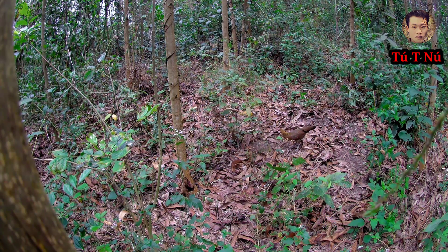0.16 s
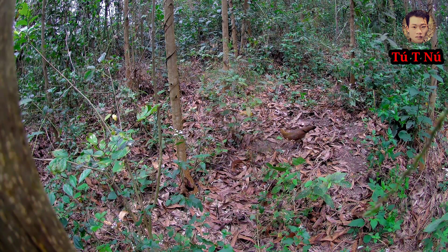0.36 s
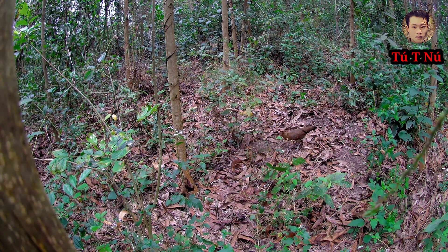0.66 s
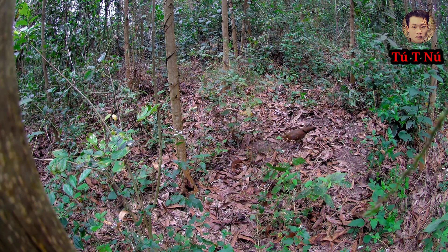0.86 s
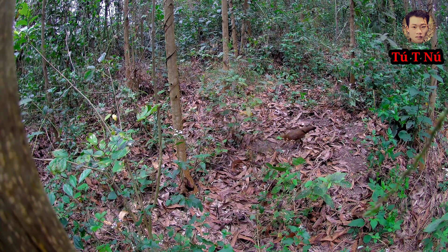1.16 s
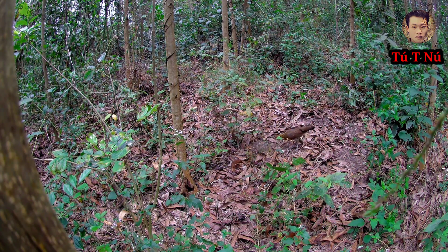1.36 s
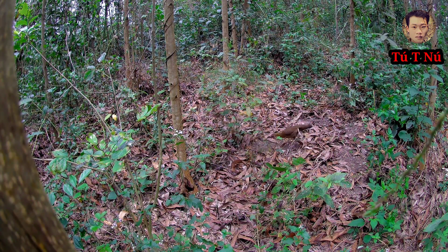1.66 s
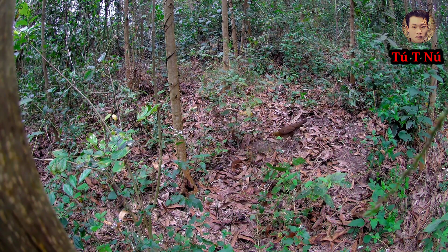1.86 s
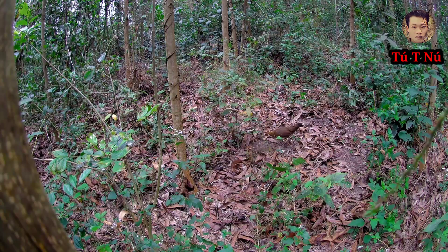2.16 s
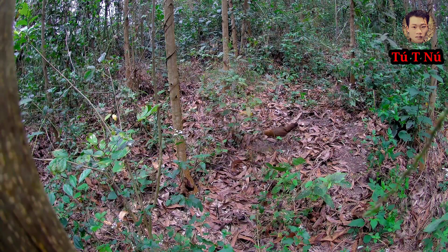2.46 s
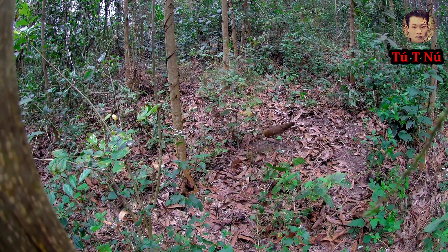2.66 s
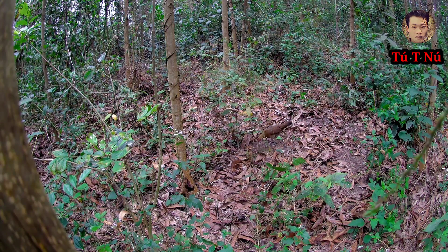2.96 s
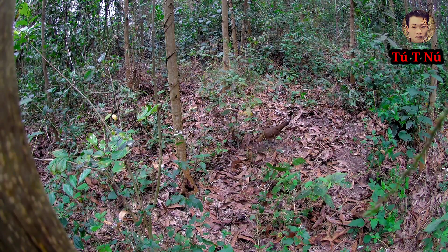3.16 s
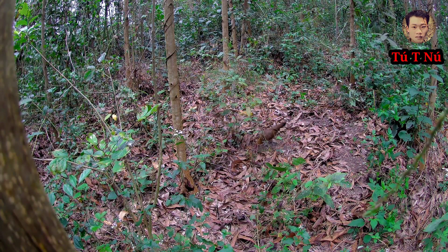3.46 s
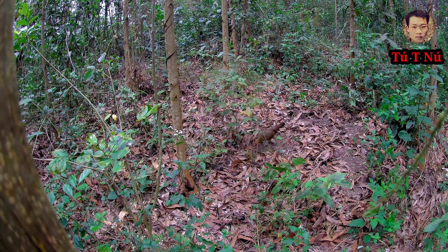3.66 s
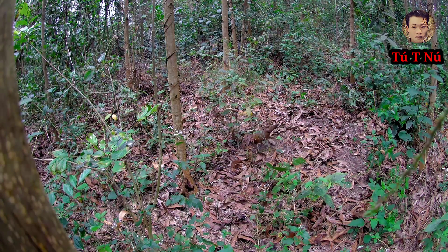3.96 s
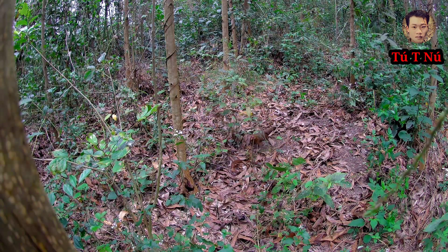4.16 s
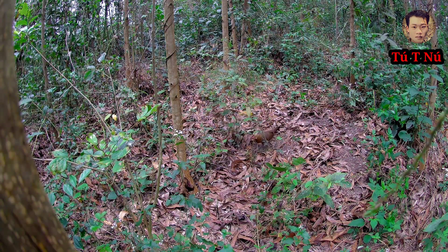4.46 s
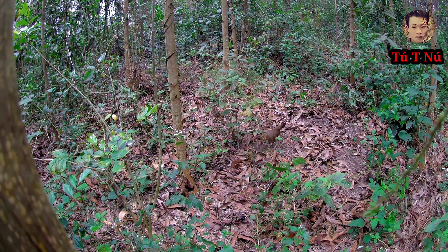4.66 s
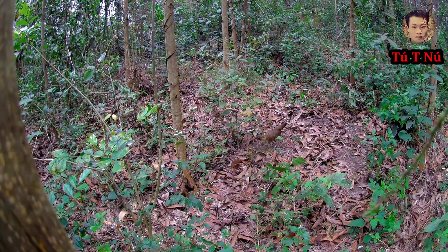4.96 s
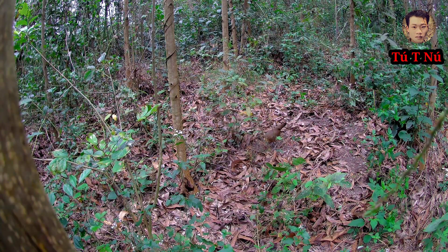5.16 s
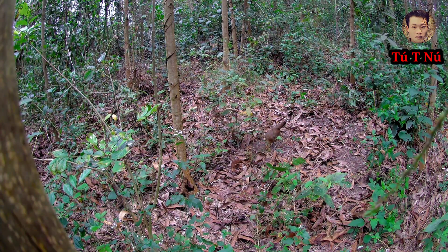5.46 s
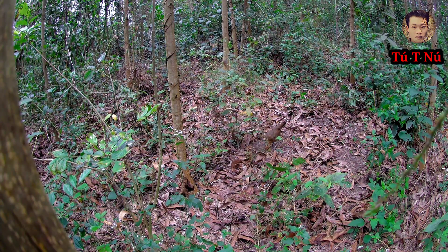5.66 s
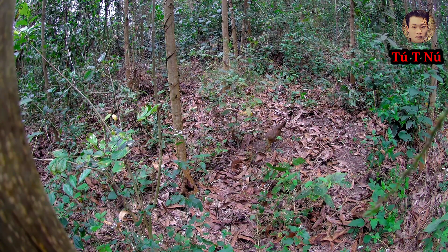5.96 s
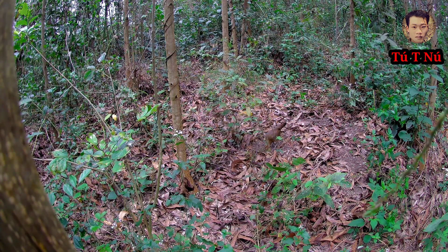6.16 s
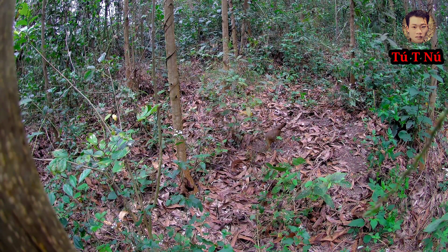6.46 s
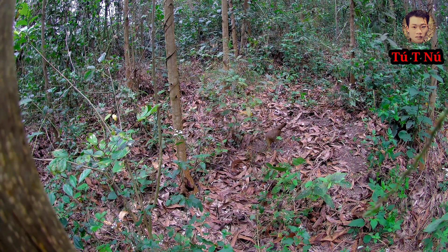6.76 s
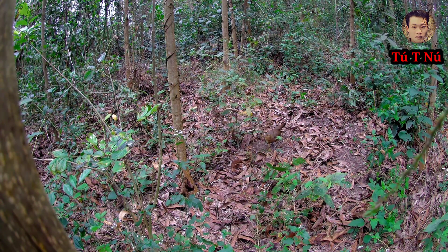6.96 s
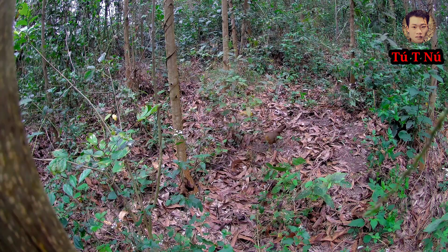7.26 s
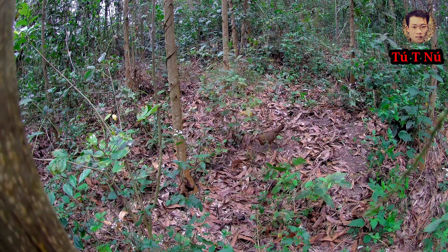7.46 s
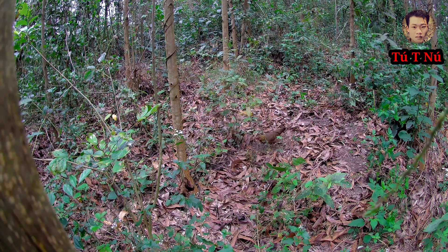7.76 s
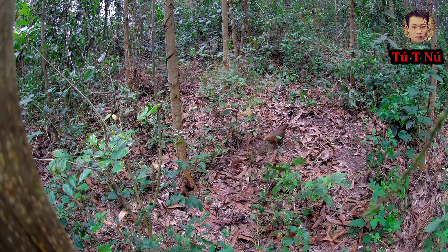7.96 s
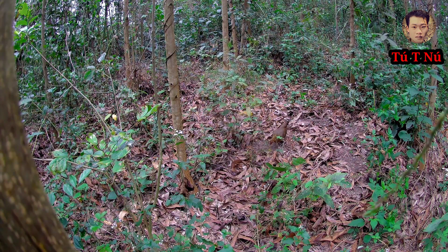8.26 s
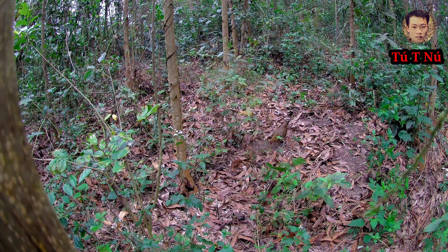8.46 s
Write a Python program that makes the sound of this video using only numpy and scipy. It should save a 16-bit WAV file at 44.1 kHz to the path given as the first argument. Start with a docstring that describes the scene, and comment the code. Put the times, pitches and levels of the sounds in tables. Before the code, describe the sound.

In a hushed forest clearing, a junglefowl hen cackles rapidly and trails off into husky cries, with faint cricket chirps behind.

```python
"""A junglefowl hen cackles some metres away in a quiet forest clearing; the trees answer weakly.
First her voice box gives a thin rising whine, while a cricket starts to chirp faintly with its wings.
Pushed harder, her voice slips and breaks into a run of harsh clucks with soft notes between them.
Then come drawn-out cries that swing between a husky tone and a rasp.
Dry leaves rustle under her feet, once before the cries and again after she falls silent."""
import sys
import numpy as np
from scipy import signal
from scipy.fft import rfft, irfft, next_fast_len
from scipy.io import wavfile
from scipy.ndimage import map_coordinates

SR = 44100
rng = np.random.default_rng(int(sys.argv[2]) if len(sys.argv) > 2 else 0)


def master(y):
    """Save y as 16-bit WAV."""
    cut = np.clip(np.atleast_2d(y).T, -1, 1)
    pcm = np.round(cut * 32767)  # scale
    wavfile.write(sys.argv[1], SR, pcm.astype(np.int16))


N = 380141
MARGIN_S = .02  # room before and after each call for its fades

# Harsh clucks, in the run and at the head of most cries: start_s, length_s, pitch_hz, level_db, swell_db
CLUCKS = [(1.637, 0.089, 501, -31.5, 2.5), (1.84, 0.097, 493.3, -31, 3), (2.034, .084, 491.6, -32, 1.5),
          (2.227, 0.094, 474.4, -32.5, 5), (2.427, 0.089, 486, -32.5, 1.5), (2.624, 0.089, 484.4, -33, 3.5),
          (2.832, 0.095, 483, -35, 0.5), (3.042, 0.098, 524, -37, 5.5), (3.254, 0.11, 508, -34, 6.5),
          (3.486, 0.1, 489, -34, 6.5), (3.711, 0.094, 484, -33, 5), (3.937, .091, 474.3, -33, 3),
          (4.156, 0.09, 481, -33.5, 3.5), (4.24, 0.034, 449.4, -44, 3), (4.404, 0.019, 514, -39, 8),
          (4.76, 0.014, 511, -39.5, 2), (5.153, 0.018, 520, -38.5, 4.5), (5.589, 0.016, 497, -38, 4),
          (6.132, 0.012, 507, -40, 6), (6.841, 0.051, 480.6, -39.5, -2.5)]


def clucks(sag=0.046, droop=0.031, usual_hz=494, peak_share=0.72, closing_db=-6.5):
    """Each cluck starts abruptly, swells, then darkens as the beak shuts; the run grows rougher."""
    out = np.zeros(N)
    for start, length, pitch_hz, db, swell_db in CLUCKS:
        t = clock(length)
        n, progress = len(t), np.clip(t / length, 0, 1)
        bend = sag * (.5 - np.sin(np.pi * progress)) + droop * (.5 - progress)
        pitch = pitch_hz * (1 + bend + 0.0316 * wobble(n, 90.7))
        source = rasp(pitch, scatter=min(.06 + .02 * (start - CLUCKS[0][0]), .105))
        centre_hz = THROAT_HZ * (pitch_hz / usual_hz) ** 0.36  # the throat partly follows the pitch
        shut = progress ** 4
        voice = (1 - shut) * throat(source, centre_hz) + shut * throat(source, centre_hz * 0.912)
        voice = unit(voice * amp(wobble(n, 196.3)))  # flutters by about 1 dB
        closing = np.clip((progress - peak_share) / (1 - peak_share), 0, 1)
        level_db = db - swell_db * np.clip(1 - progress / peak_share, 0, 1) + closing_db * closing ** 2
        add(out, start - MARGIN_S, voice * amp(level_db) * fade(t, length, .005, 0.46 * length))
    return out


# Tone of the hard-pushed voice box, strongest where it locks to the windpipe: frequency_hz, gain_db
RASP_TONE = [(500, -25), (930, -11), (1300, -9.5), (1550, -20.5), (1870, 0.5), (2060, 3.5), (2450, -8.5),
             (3000, -13.5), (4500, -18), (8000, -41)]


def rasp(pitch, scatter, noise_db=-8.5):
    """Pushed hard, the voice box slips every few milliseconds, smearing its harmonics into a rasp."""
    n = len(pitch)
    cycles = np.cumsum(pitch) / SR
    jumps, swing = slips(n, per_s=1900 * max(scatter, .01))
    disorder = jumps + np.cumsum(pitch * scatter * wobble(n, 1500)) / SR
    tone = np.zeros(n)
    for k in range(1, 17):
        share = 0.607 if k <= 2 else 1  # the lowest two stay steadier, so the call keeps a pitch
        phase = 2 * np.pi * (k * (cycles + disorder * share) + rng.random())
        tone += amp(look_up(RASP_TONE, k * pitch)) * np.sin(phase)
    return unit(tone * swing) + amp(noise_db) * rng.standard_normal(n)


def slips(n, per_s, jump_cycles=.17, dip=.95, width_s=.0026):
    """At each sudden slip, the vibration of the voice box jumps out of step and briefly collapses."""
    gaps = np.exp(.5 * rng.standard_normal(int(n * per_s / SR) * 2 + 4))
    at = (np.cumsum(gaps) * SR / per_s).astype(int)
    marks = (np.bincount(at[at < n], minlength=n) > 0) * 1.
    bump = np.hanning(int(width_s * SR))
    kicks = np.convolve(marks * jump_cycles * rng.standard_normal(n), bump / bump.sum(), "same")
    swing = np.clip(1 - dip * np.convolve(marks, bump, "same"), 0, 1)
    return np.cumsum(kicks), swing


# How the windpipe and beak shape the voice when tuned to THROAT_HZ: frequency_hz, gain_db
THROAT_TONE = [(300, -49), (620, 4.5), (950, -1), (1230, -4), (1600, 4), (1980, 3), (2600, -2.5),
               (3170, -16), (3850, -23.5), (4120, -2), (4530, -13.5), (5150, -6), (5550, -26.5),
               (7600, -12), (10000, -45)]
THROAT_HZ = 1980


def throat(x, centre_hz=THROAT_HZ):
    """The throat rings at several frequencies, which move together as the beak opens."""
    return filtered(x, lambda hz: amp(look_up(THROAT_TONE, hz * THROAT_HZ / centre_hz)))


# Drawn-out cries, one list of points for each: time_s, pitch_hz, level_db
CRY_CURVES = [
    [(4.42, 618, -52), (4.454, 651, -35), (4.472, 475, -33), (4.484, 452, -33), (4.54, 568.5, -47),
     (4.586, 563, -43), (4.598, 536, -42), (4.618, 530, -46.5)],
    [(4.69, 479, -53), (4.756, 506, -52), (4.766, 556.5, -51.5), (4.81, 599.4, -37.5), (4.83, 452, -31.5),
     (4.86, 455, -35.5), (4.884, 517, -34.5), (4.912, 488, -51), (4.964, 493, -35.5), (4.978, 457, -33),
     (4.996, 470, -41.5)],
    [(5.174, 563, -50), (5.21, 618, -42), (5.23, 502.5, -30.5), (5.242, 510.4, -36.5), (5.266, 575.4, -44),
     (5.312, 600, -53), (5.322, 608.5, -37), (5.34, 524, -34.5), (5.378, 583, -40.5), (5.4, 505, -47)],
    [(5.606, 531.7, -48), (5.638, 540.4, -37.5), (5.7, 467, -34), (5.724, 484, -34), (5.738, 528.5, -39),
     (5.78, 548, -37), (5.788, 523.2, -33.5), (5.836, 502, -36.5), (5.858, 554, -46)],
    [(6.15, 566.4, -47), (6.228, 609, -47), (6.248, 633, -35), (6.296, 608.8, -35.5), (6.31, 663, -39),
     (6.354, 669, -38.5), (6.378, 606, -39.5), (6.4, 614.4, -43.5)],
    [(6.41, 578.5, -45), (6.436, 598, -47), (6.446, 565, -45.5), (6.486, 603, -37), (6.496, 620, -36.5),
     (6.552, 605.5, -50)],
    [(6.588, 594, -50.5), (6.644, 583, -46), (6.657, 620, -49)],
]


def cries(break_db=-44.5, break_width_db=5.5, locked_hz=500, ring_hz=2130, ring_width_hz=67):
    """When the hen pushes harder, a husky tone breaks into a rasp pulled toward the windpipe's pitch."""
    out = np.zeros(N)
    windpipe_ring = lambda hz: amp(0.5 / (1 + ((hz - ring_hz) / ring_width_hz) ** 2))
    for curve in CRY_CURVES:
        start, length, t, pitch, db = follow(curve)
        husky = soft_voice(pitch, -46 + look_up(THROAT_TONE, 2 * pitch), db - 2, hoarse=0.372)
        source = rasp(locked_hz * (pitch / locked_hz) ** .4, scatter=.095)
        harsh = filtered(throat(source, centre_hz=1975), windpipe_ring)
        harsh = amp(db + 0.35) * unit(harsh * amp(1.45 * wobble(len(t), 131)))
        voice = crack(husky, harsh, (db - break_db) / break_width_db)
        add(out, start - MARGIN_S, voice * fade(t, length, 0.0035, 0.042))
    return out


# Points along the opening whine: time_s, pitch_hz, level_db
WHINE_CURVE = [(0.74, 375, -45.5), (0.764, 385, -45.5), (0.794, 497, -68), (0.818, 409.4, -44),
               (0.836, 484, -54.5), (0.886, 499, -54.5), (0.988, 531, -48.5), (1.012, 480, -44),
               (1.174, 523, -29.5), (1.22, 510, -35), (1.282, 546, -32), (1.3, 504, -30.5),
               (1.326, 551, -36.5), (1.35, 522, -39), (1.396, 500.7, -40), (1.44, 550, -35),
               (1.498, 513, -34.5), (1.51, 500, -39.5)]


def whine(waver=0.00384, strain=0.036, flutter_db=2, odd_join_s=1.04, break_width_db=1.7):
    """A long clear note swells, grows unsteady and cracks ever more easily."""
    out = np.zeros(N)
    start, length, t, pitch, db = follow(WHINE_CURVE)
    n, late = len(t), np.clip(t / length, 0, 1) ** 2
    shaky_pitch = pitch * (1 + waver * wobble(n, 150) + strain * late ** 2 * wobble(n, 1000))
    second_db = -50 + 0.21 * (db - db.max()) + flutter_db * np.sqrt(late) * wobble(n, 220)
    upper_db = db - 2 + flutter_db * late * wobble(n, 220)
    # the note sounds an octave higher until the odd harmonics join
    odd_gain = np.clip((start + t - odd_join_s) / 0.062 + .5, 0, 1)
    clear = clear_voice(shaky_pitch, second_db, upper_db, odd_gain)
    # the nearly shut beak cuts both treble and bass
    clear = filtered(clear, lambda hz: 1 / (1 + (hz / 5250) ** 20) / (1 + (680 / (hz + 1)) ** 10))
    harsh = amp(db + 2.3) * unit(throat(rasp(pitch, scatter=0.077)))
    break_db = -37.5 + 29.5 * (length - t)
    voice = crack(clear, harsh, (db - break_db) / break_width_db) * amp(0.8 * wobble(n, 121.5))
    add(out, start - MARGIN_S, voice * fade(t, length - .005, .005, 0.0064))
    return out


def crack(clear, harsh, excess):
    """Pushed past its limit (excess above 0), the clear voice gives way to the rasp."""
    share = .5 + .5 * np.tanh(excess)
    return np.sqrt(1 - share) * clear + np.sqrt(share) * harsh


# Soft notes between the clucks: start_s, length_s, final_pitch_hz, level_db, upper_boost_db
SOFT_NOTES = [(1.566, 0.04, 494, -57, -2), (1.799, 0.033, 508, -53, 1.5), (1.986, 0.065, 483, -51, -3),
              (2.173, 0.051, 510.4, -50, -5.5), (2.357, 0.045, 507, -51.5, -3),
              (2.538, .066, 505, -52.5, -4), (2.739, 0.053, 512, -48, -4.5),
              (2.916, 0.038, 499.3, -54.5, 3.5), (3.126, 0.055, 495, -46, -9),
              (3.365, 0.074, 457, -45.5, 0.5), (3.564, 0.07, 468, -46, -4), (3.754, 0.056, 504.5, -47, 0.5)]


def soft_notes(climb=0.0837, tail_s=0.028, tail_db=-27, edge_s=0.0044):
    """The relaxed voice makes soft rising notes between the clucks and a short one as each cluck ends."""
    out = np.zeros(N)
    tails = [(start + length - tail_s / 2, tail_s, hz, db + tail_db, 0)
             for start, length, hz, db, _ in CLUCKS]
    for start, length, final_hz, db, upper_boost_db in SOFT_NOTES + tails:
        t = clock(length)
        risen = np.sin(np.pi / 2 * np.clip(t / length, 0, 1))
        pitch = final_hz * (1 - climb * (1 - risen))
        voice = soft_voice(pitch, db, db + upper_boost_db, hoarse=0.36)
        add(out, start - MARGIN_S, voice * fade(t, length, edge_s, edge_s))
    return out


def soft_voice(pitch, second_db, upper_db, hoarse):
    """Gentle breath gives a clear voice; hoarseness (0 to 1) turns its upper part to a husky sputter."""
    n = len(pitch)
    pitch = pitch * (1 + 0.0189 * wobble(n, 85.7) + 0.091 * hoarse * wobble(n, 1495))
    upper_db = upper_db + 2.5 * np.sqrt(hoarse) * wobble(n, 211)
    second_db = second_db + 0.9 * wobble(n, 69.4)
    clear_db = upper_db + 10 * np.log10(1 - hoarse + 1e-3)
    tone = clear_voice(pitch, second_db, clear_db, odd_gain=2 * np.tanh(2 * hoarse))
    husk = filtered(throat(rng.standard_normal(n)), lambda hz: amp(look_up(RASP_TONE, hz) / 2))
    return tone + hoarse * amp(upper_db - 2) * unit(husk)


# Harmonics (whole multiples of the pitch) of the clear voice: multiple, gain_db
HARMONICS = [(1, -13.5), (3, -12.5), (4, -1.5), (5, -31), (6, -38), (8, -33), (9, -34), (10, -30.5)]


def clear_voice(pitch, second_db, upper_db, odd_gain):
    """An even vibration gives a second harmonic, plus a group of others around the fourth."""
    phase = 2 * np.pi * np.cumsum(pitch) / SR
    group = sum(amp(db) * np.sin(k * phase) * (odd_gain if k % 2 else 1) for k, db in HARMONICS)
    return np.sqrt(2) * (amp(second_db) * np.sin(2 * phase) + amp(upper_db) * group)


# Tiny squeaks of the voice: start_s, length_s, first_hz, last_hz, level_db
SQUEAK_GLIDES = [(1.617, 0.0187, 1650, 1190, -48), (1.625, 0.011, 2700, 2470, -47.5),
                 (1.83, 0.013, 1760, 1500, -49), (2.404, 0.017, 1580, 1480, -53),
                 (2.563, 0.018, 1600, 1520, -50), (6.548, 0.036, 2000, 1885, -40.5),
                 (6.661, 0.03, 1930, 2030, -41.5)]


def squeaks(wander=.02, edge_s=0.014):
    """At the edge of a call the voice can narrow to one gliding tone."""
    out = np.zeros(N)
    for start, length, first_hz, last_hz, db in SQUEAK_GLIDES:
        t = clock(length)
        hz = np.interp(t, [0, length], [first_hz, last_hz]) * (1 + wander * wobble(len(t), 295))
        tone = np.sqrt(2) * np.sin(2 * np.pi * np.cumsum(hz) / SR)
        add(out, start - MARGIN_S, amp(db) * tone * fade(t, length, edge_s, edge_s))
    return out


# What the way from hen to listener adds to all her call levels: frequency_hz, gain_db
PATH_TONE = [(550, -2.5), (690, 3), (770, 2), (1000, 1.5), (1500, 1.5), (2200, 1), (2320, -4), (2560, 3.5),
             (2700, -2.5), (2810, -4.5), (2920, 5), (3100, -3), (4050, 1.5), (4200, 1.5), (4350, 4),
             (4520, 1), (4650, 6), (5200, 6), (6000, 0.5)]


def forest_path(x):
    """Passing over the ground and between trunks lifts some frequencies and weakens others."""
    return filtered(x, lambda hz: amp(look_up(PATH_TONE, hz)))


# How long the echo of the trees takes to fade by 60 dB: frequency_hz, fade_s
ECHO_TIMES = [(500, 0.098), (2000, 0.28), (8000, 0.089)]


def tree_echo(x, echo_db=-24):
    """Trunks and leaves scatter back a short, weak echo."""
    hz, t, noise = signal.stft(rng.standard_normal(SR // 2), SR, nperseg=256)
    decay = amp(-60 * t / look_up(ECHO_TIMES, hz)[:, None])
    tail = signal.istft(noise * decay, SR, nperseg=256)[1]
    return amp(echo_db) * signal.fftconvolve(x, tail / np.linalg.norm(tail))[:N]


# Spells of cricket chirping: start_s, end_s, level_db
CHIRP_SPELLS = [(0.761, 1.75, -69.5), (3.307, 4.0, -71), (4.895, 5.75, -67), (6.373, 7.46, -67.5)]


def cricket(top_hz=4680, drop_hz=260, stroke_s=0.01, spacing_s=.015, period_s=.0522):
    """Each chirp is a pair of wing strokes that fall in pitch."""
    out = np.zeros(N)
    progress = np.linspace(0, 1, int(stroke_s * SR))
    stroke = np.sin(np.pi * progress) * np.sin(2 * np.pi * np.cumsum(top_hz - drop_hz * progress) / SR)
    for start, end, db in CHIRP_SPELLS:
        for chirp_s in np.arange(start, end, period_s):
            for delay in (0, spacing_s):
                add(out, chirp_s + delay, np.sqrt(2) * amp(db + rng.normal(0, 2.0)) * stroke)
    return out


# The hen's steps in dry leaves: start_s, length_s, level_db, centre_hz
FOOTSTEPS = [(4.262, .009, -57, 8800), (4.275, 0.0026, -56, 8800), (7.423, 0.069, -72, 6540),
             (7.478, 0.018, -66, 7500), (7.658, .1, -72, 7000), (7.812, 0.0066, -68, 5500),
             (7.908, .08, -73, 7000), (8.018, .02, -69, 7000)]


def leaves(grain_db=4, width_octaves=0.22):
    """Each step crushes dry leaves into a short grainy crackle."""
    out = np.zeros(N)
    for start, length, db, centre_hz in FOOTSTEPS:
        n = int(length * SR)
        crackle = rng.standard_normal(n) * amp(grain_db * wobble(n, 700)) * np.hanning(n) ** .5
        band = lambda hz: np.exp(-.5 * (np.log2((hz + 1) / centre_hz) / width_octaves) ** 2)
        add(out, start, amp(db) * unit(filtered(crackle, band)))
    return out


# Tone of the background hush: frequency_hz, gain_db
HUSH_TONE = [(12, -38), (20, -5.5), (22, -28.5), (33, -18.5), (70, -22.5), (103, -24), (140, -22),
             (165, -22.5), (424, -27.5), (740, -30.5), (1400, -33.5), (2510, -40.5), (8520, -42.5),
             (11900, -46.5), (15300, -58)]


def air(level_db=-57.5, drift_db=0.3):
    """The steady hush of the clearing and the hiss of the microphone."""
    hush = unit(filtered(rng.standard_normal(N), lambda hz: amp(look_up(HUSH_TONE, hz))))
    return amp(level_db - drift_db * wobble(N, 3.0)) * hush


def amp(db):
    """Turn decibels into a gain."""
    return 10 ** (np.asarray(db) / 20)


def unit(x):
    """Scale a sound to an average power of 1."""
    return x / np.sqrt(np.mean(x ** 2) + 1e-20)


def look_up(table, hz):
    """Read between the rows of a (frequency_hz, value) table, with octaves evenly spaced."""
    frequencies, values = np.transpose(table)
    return np.interp(np.log(hz + 1), np.log(frequencies + 1), values)


def wobble(n, per_s):
    """A smooth curve of n samples through per_s random points a second."""
    return map_coordinates(rng.standard_normal(int(n * per_s / SR) + 4), [np.arange(n) * per_s / SR])


def filtered(x, gain):
    """Turn each frequency in x up or down by gain(hz)."""
    size = next_fast_len(len(x) + SR // 10)
    return irfft(rfft(x, size) * gain(np.fft.rfftfreq(size, 1 / SR)), size)[:len(x)]


def add(track, start_s, x):
    """Mix x into the track at start_s."""
    part = track[round(start_s * SR):][:len(x)]
    part += x[:len(part)]


def fade(t, length, rise_s, fall_s):
    """Fade in around time 0 and out around length."""
    opening = np.clip(t / rise_s + .5, 0, 1)
    closing = np.clip((length - t) / fall_s + .5, 0, 1)
    return np.sin(np.pi / 2 * opening * closing) ** 2


def clock(length):
    """Seconds since the start of a call, with a margin at both ends."""
    return np.arange(int((length + 2 * MARGIN_S) * SR)) / SR - MARGIN_S


def follow(curve):
    """Join the points of a long call; gives its start, length, clock, pitch and level."""
    times, pitch, db = np.transpose(curve)
    start, length = times[0], times[-1] - times[0]
    t = clock(length)
    return start, length, t, np.interp(t + start, times, pitch), np.interp(t + start, times, db)


def scene():
    """The hen and her surroundings, in one channel."""
    hen = forest_path(whine() + clucks() + soft_notes() + cries() + squeaks())
    return (hen + tree_echo(hen) + cricket() + leaves() + air())[None]


def record(dry):
    """The recorder cuts the highest treble and shifts the wave slightly off zero."""
    top_hz, offset = 15450, -.011
    return np.array([filtered(x, lambda hz: hz < top_hz) for x in dry]) + offset


dry = scene()
out = record(dry)
master(out)
```